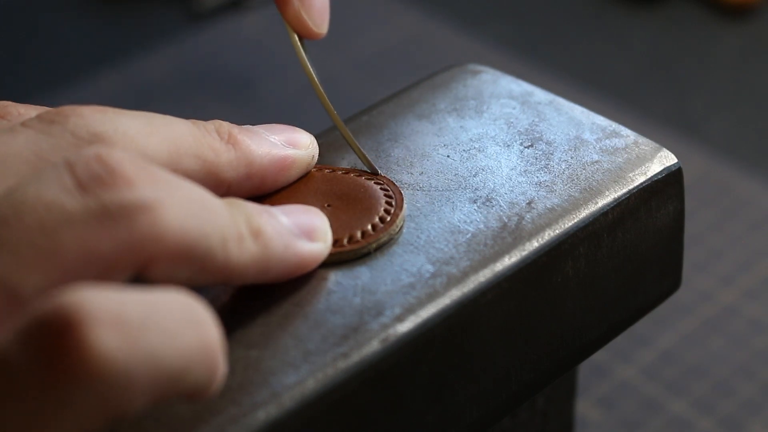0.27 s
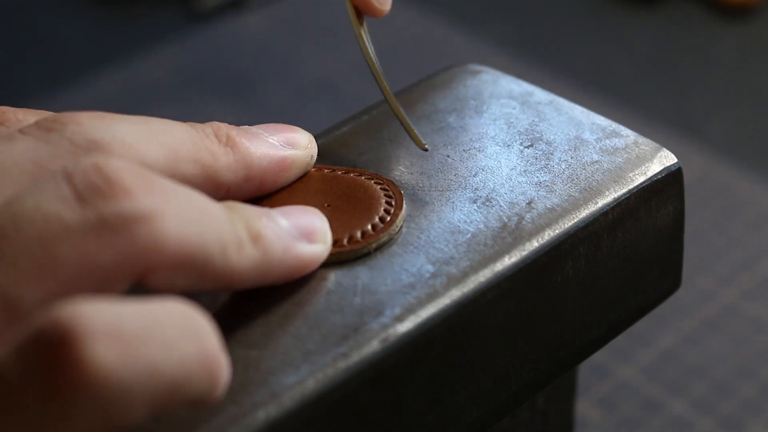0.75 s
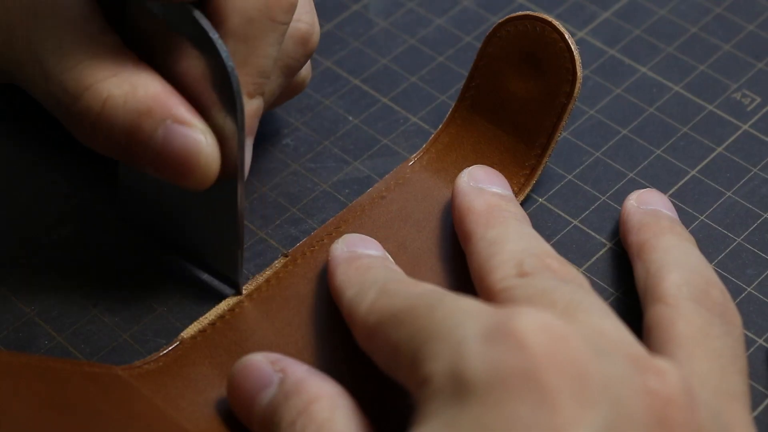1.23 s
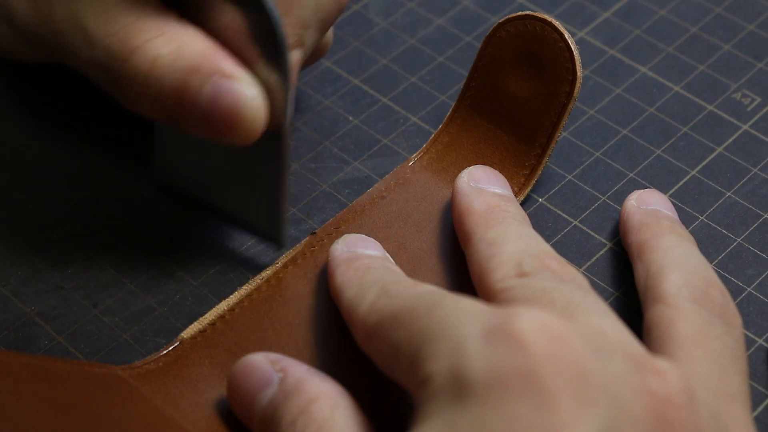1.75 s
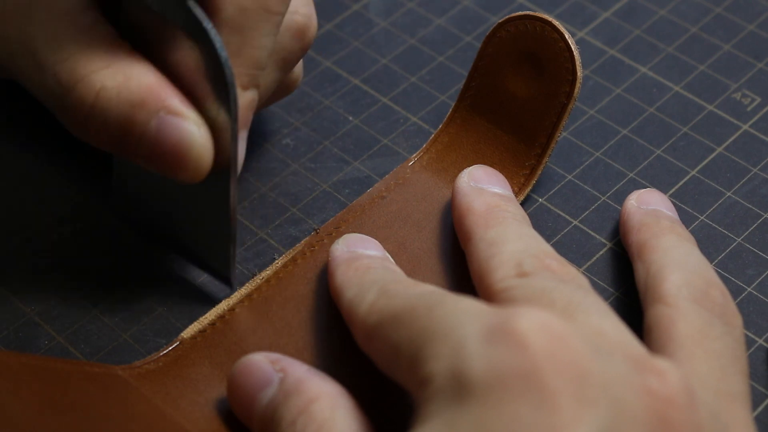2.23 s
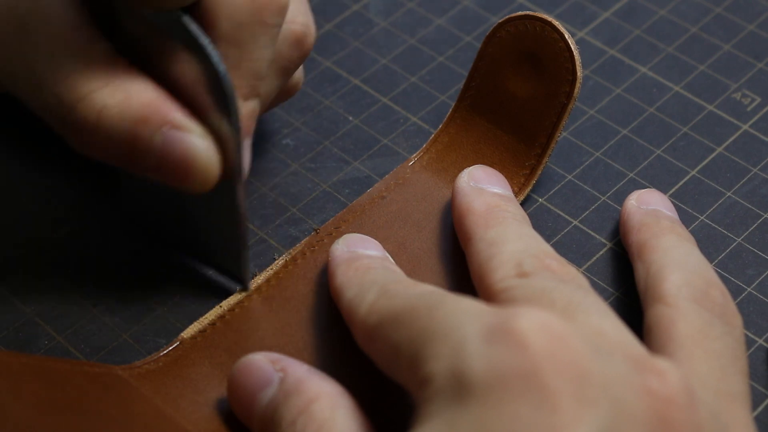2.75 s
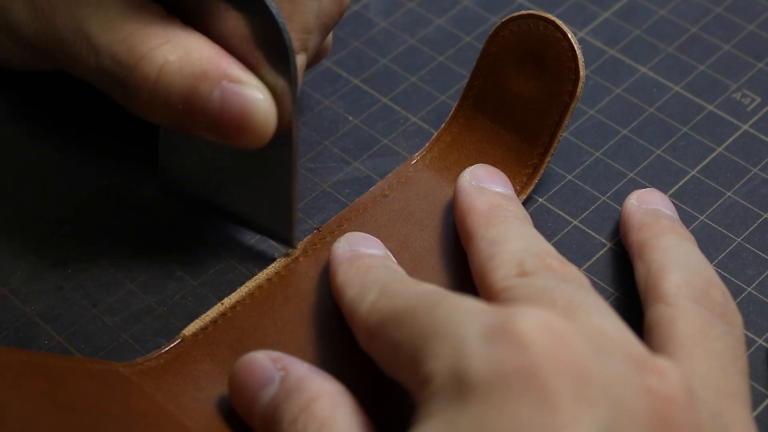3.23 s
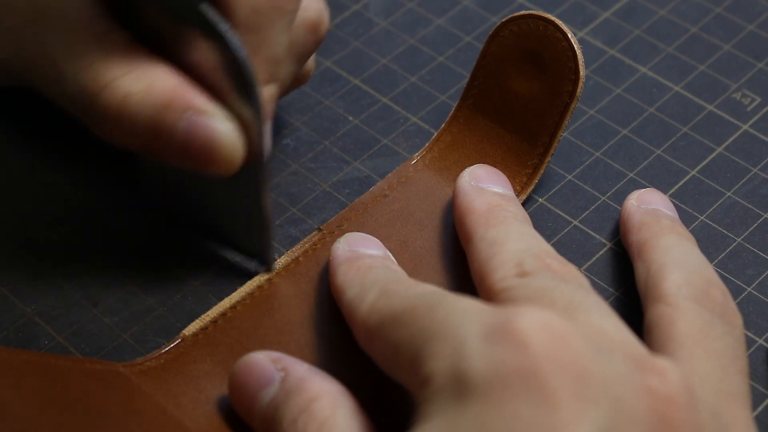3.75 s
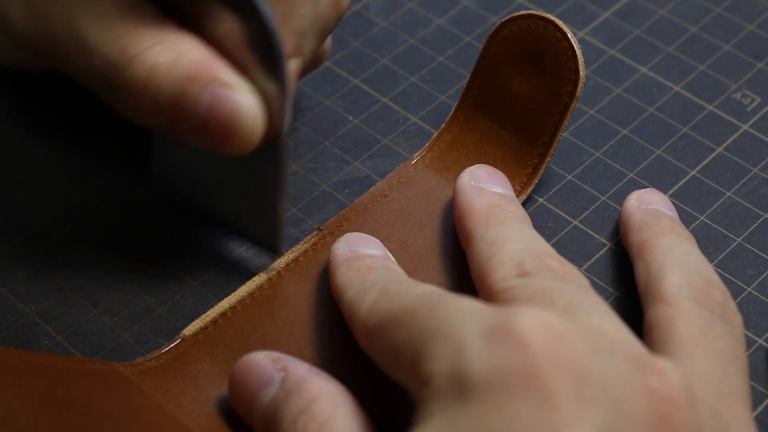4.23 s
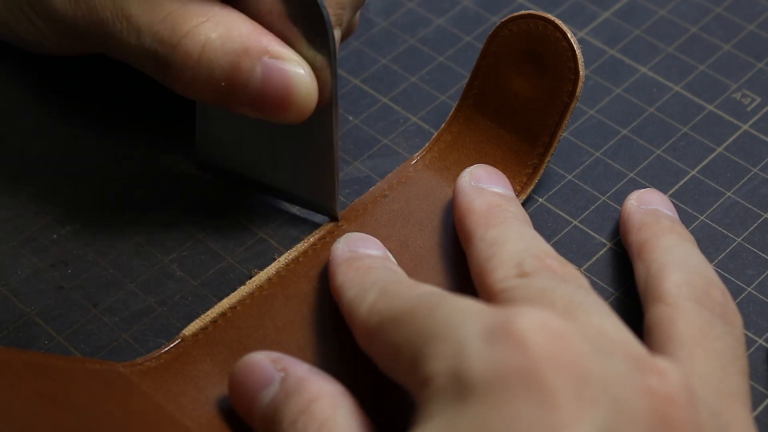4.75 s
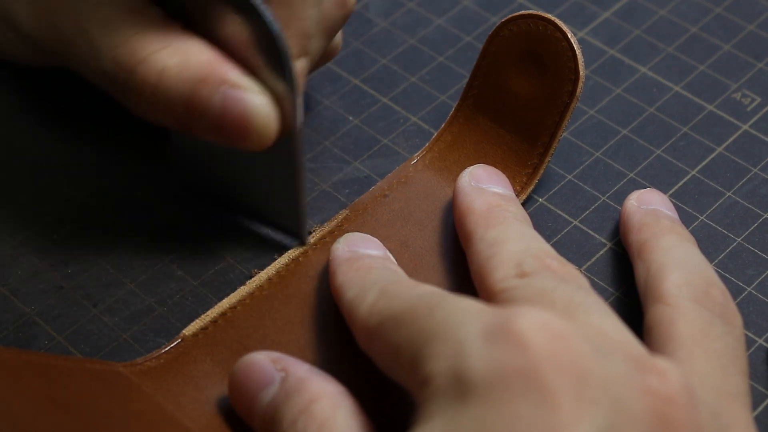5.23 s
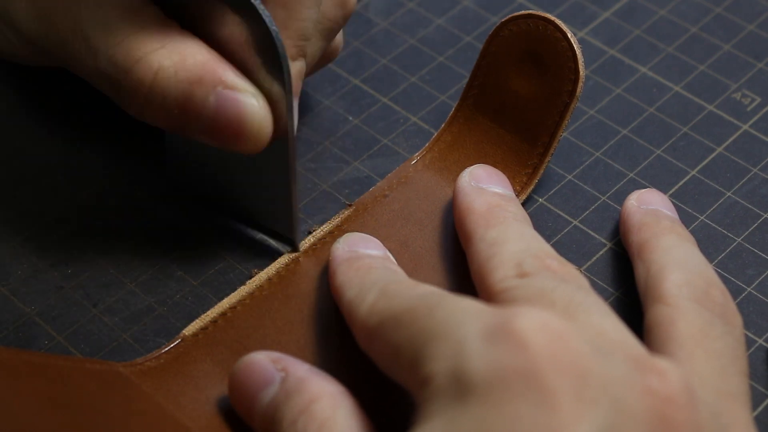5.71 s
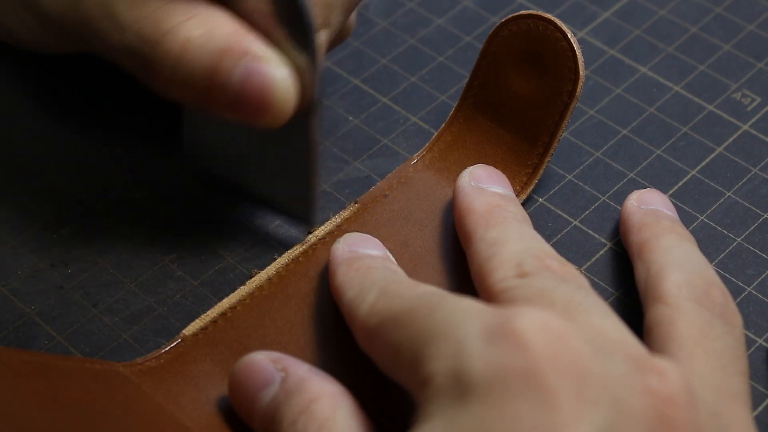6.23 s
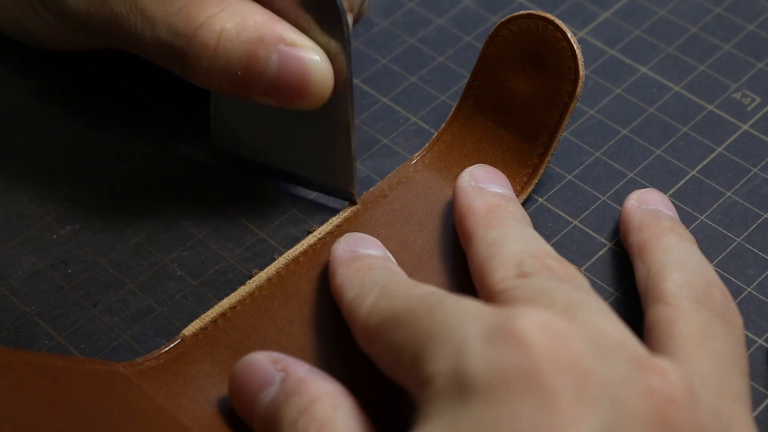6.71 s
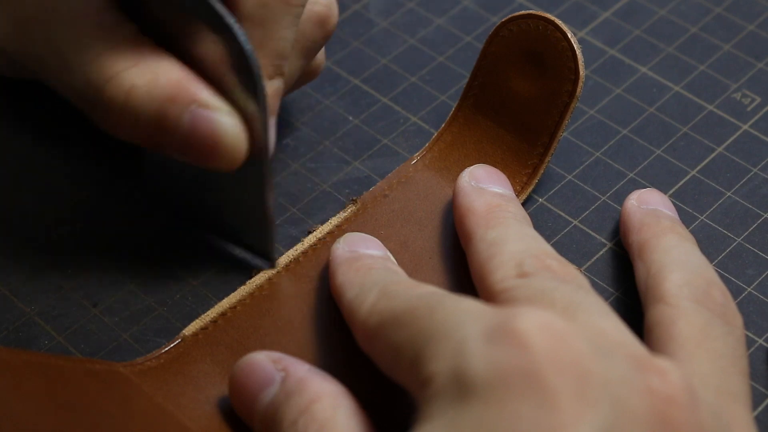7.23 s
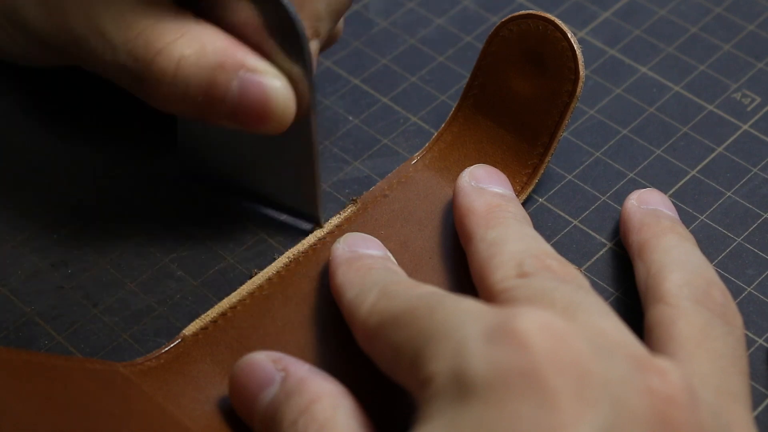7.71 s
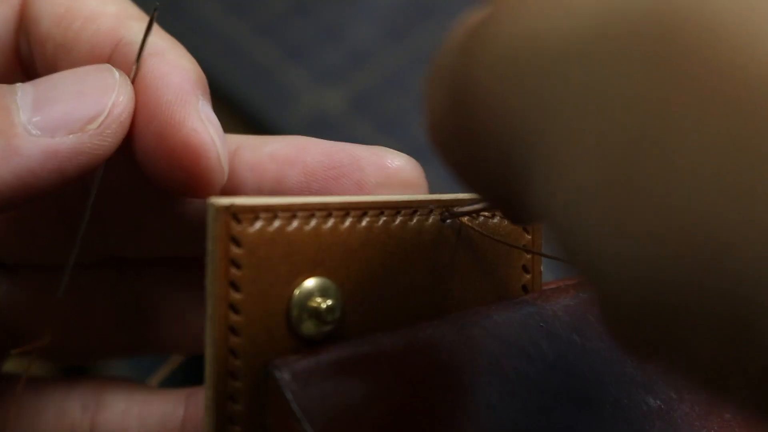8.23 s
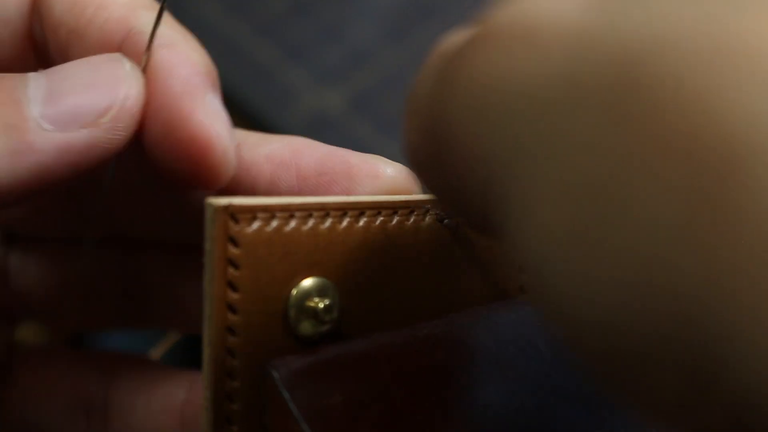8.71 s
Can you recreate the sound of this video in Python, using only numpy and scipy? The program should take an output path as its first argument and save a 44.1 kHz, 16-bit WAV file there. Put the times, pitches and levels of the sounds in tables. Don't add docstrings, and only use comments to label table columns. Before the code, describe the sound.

A thin steel scraper rasps along a leather edge in short gritty strokes, with soft taps between, in a small quiet workshop.

```python
import sys
import numpy as np
from scipy import signal
from scipy.fft import rfft, irfft, next_fast_len
from scipy.io import wavfile
from scipy.ndimage import uniform_filter1d, map_coordinates

SR = 44100
rng = np.random.default_rng(int(sys.argv[2]) if len(sys.argv) > 2 else 0)


def voltage_ratio(level):
    return 10 ** (np.asarray(level, float) / 20)


def persist_wave(psi):
    counts = np.round(np.clip(psi, -1, 1) * 32767).astype(np.int16)
    wavfile.write(sys.argv[1], SR, np.atleast_2d(counts).T)


N = 395189

# [start t/s, room hiss level/dB, hum below 300 Hz against the hiss level/dB]
SCENES = [
    (0, -66.5, -7.5),
    (0.8628, -60.5, -8),
    (8.1848, -61, -11.5),
]
# [t/s, thump rms level/dB, click peak level/dB]
LANDINGS = [(1.5903, -51.1, -46.8), (1.8969, -48.8, -39.0), (2.7619, -47.1, -44.2), (3.0696, -46.7, -40.8),
            (3.393, -50.9, -42.3), (3.7254, -48.1, -46.5), (4.0394, -47.1, -41.2), (4.3497, -45.0, -41.2),
            (4.6644, -49.2, -42.7), (4.949, -45.2, -42.1), (5.2348, -45.4, -34.9), (5.5002, -47.7, -38.4),
            (5.7655, -48.5, -40.9), (6.045, -47.0, -40.0), (6.3222, -46.0, -35.7), (6.6134, -51.1, -43.9),
            (6.9294, -58.1, -46.4), (7.2345, -46.8, -38.3), (7.9139, -45.5, -37.4)]
# [f/Hz, width/Hz, level/dB]
LEATHER = [(351, 90, -1.5), (411, 7.5, 4.5), (468, 57, 1), (482.4, 5.7, 4.5), (583, 15, -3), (606, 24, -11),
           (794, 17, -8.5), (870, 18, 1.5), (998, 33, -1.5), (1174, 81, 3), (1243, 23, -1)]


def unit(x):
    return x / np.sqrt(np.mean(x ** 2) + 1e-20)


def along(points, hz):
    f, value = np.transpose(points)
    return np.interp(np.log(hz + 1), np.log(f + 1), value)


def filtered(x, response):
    size = next_fast_len(N + SR // 2)
    return irfft(rfft(x, size) * response(np.fft.rfftfreq(size, 1 / SR)), size)[..., :N]


def modes(table):
    def response(f):
        total = 0
        for k, (centre, width, db) in enumerate(table):
            ringing = 1j * f * width / (centre * centre - f * f + 1j * f * width)
            total = total + (-1) ** k * voltage_ratio(db) * ringing
        return total
    return response


def band(lo_hz, hi_hz):
    return lambda f: (f / lo_hz) ** 4 / (1 + (f / lo_hz) ** 4) / (1 + (f / hi_hz) ** 4)


def wobble(rate):
    knots = rng.standard_normal(int(N * rate / SR) + 4)
    return map_coordinates(knots, [np.arange(N) * rate / SR])


def by_scene(column):
    starts = [row[0] for row in SCENES]
    return np.array(column)[np.searchsorted(starts, np.arange(N) / SR, side="right") - 1]


def room_tone():
    # [f/Hz, level per Hz/dB]
    hiss = [(15, -75), (25, -24), (70, -35), (86, -7.5), (152, -3), (204, -2), (227, -4), (260, -6.5),
            (389, -11.5), (973, -14.5), (1340, -17.5), (4390, -20.5), (14000, -28), (15600, -32)]
    # [f/Hz, likeness 0 to 1]
    alike = [(60, 1), (180, 0.65), (550, 0.16), (1650, 0.043), (4970, 0.02), (15000, 0.01)]

    def mid_and_side(hz):
        turn = np.arccos(np.clip(along(alike, hz), -1, 1)) / 2
        return voltage_ratio(along(hiss, hz)) * [np.cos(turn), np.sin(turn)]

    mid, side = filtered(rng.standard_normal((2, N)), mid_and_side)
    tone = unit(np.array([mid + side, mid - side]))
    hum = filtered(tone, lambda hz: 1 / (1 + (hz / 300) ** 4))
    _, level_db, hum_db = [by_scene(column) for column in np.transpose(SCENES)]
    return voltage_ratio(level_db + 3 + .4 * wobble(9)) * (tone + (voltage_ratio(hum_db) - 1) * hum)


def rubs():
    # [t/s, length/s, level/dB, f/Hz, width/Hz]
    small_rubs = [
        (0.42, 0.08, -66.5, 3300, 900),
        (.41, 0.04, -70, 6300, 2540),
        (8.303, 0.072, -69, 3780, 200),
        (8.507, 0.26, -64, 1060, 170),
        (8.785, 0.0045, -57.5, 3200, 2500),
        (8.81, 0.078, -68, 3500, 3000),
        (8.96, 0.036, -62, 1010, 150),
    ]
    t = np.arange(-SR // 4, SR // 4) / SR
    out = np.zeros((2, N + SR))
    for s, length, db, hz, width_hz in small_rubs:
        noise = rng.standard_normal(len(t)) + 0.74 * rng.standard_normal((2, len(t)))
        resonance = modes([(hz, width_hz, 0)])(np.fft.rfftfreq(len(t), 1 / SR)) ** 2
        ring = unit(irfft(rfft(noise) * resonance))
        swell = np.exp(-(2 * t / length) ** 2)
        out[:, round(s * SR) - SR // 4:][:, :len(t)] += voltage_ratio(db) * swell * ring
    return out[:, :N] * voltage_ratio(2.2 * wobble(30))


def fibres(share, scatter_db, clump_db, contact_db):
    size = voltage_ratio(scatter_db * rng.standard_normal((2, N)))
    slips = (rng.random((2, N)) < share) * rng.standard_normal((2, N)) * size
    clumps = voltage_ratio(clump_db * (0.36 * wobble(45) + wobble(170) + 0.52 * wobble(500)))
    z = signal.stft(slips * clumps, nperseg=256)[2]
    colour = uniform_filter1d(rng.standard_normal(z.shape[1:]), size=4, axis=0)
    colour = uniform_filter1d(colour, size=24, axis=1)
    return signal.istft(z * voltage_ratio(contact_db * unit(colour)), nperseg=256)[1][:, :N]


def stroke(s, run_up, hold, bite_db_per_s):
    t = np.arange(SR // 2) / SR - .1
    rise = -8 * np.clip(1 - t / run_up, 0, 1) ** 1.9 + bite_db_per_s * np.minimum(t, 0)
    droop = -6 * np.clip((t - run_up) / hold, 0, 1) ** 2
    lift = -283 * np.maximum(t - run_up - hold, 0)
    touching = t > -0.024
    return round((s - .1) * SR), np.where(touching, rise + droop + lift, -120)


def scraper():
    # [the edge bites t/s, time to full speed/s, hold until it eases/s, blade level/dB, weight on table level/dB]
    strokes = [(1.311, 0.054, 0.044, -50, -56.3), (1.622, 0.053, 0.069, -46.5, -57),
               (1.945, 0.043, 0.022, -36, -54), (2.493, 0.061, 0.036, -50.5, -53),
               (2.79, 0.059, 0.05, -47, -52.5), (3.094, 0.044, 0.071, -49, -54.5),
               (3.428, 0.04, 0.061, -44, -51.5), (3.761, 0.062, 0.033, -43.5, -50),
               (4.073, 0.04, 0.063, -43.5, -50), (4.396, 0.061, 0.042, -41.7, -46),
               (4.696, 0.056, 0.032, -43.5, -54), (4.978, 0.038, 0.05, -43.5, -49.5),
               (5.257, 0.024, 0.054, -43.5, -50.5), (5.53, 0.025, 0.041, -43.5, -50),
               (5.789, 0.057, 0.045, -47, -48.5), (6.079, 0.067, 0.025, -46, -47.5),
               (6.363, 0.041, 0.043, -41.5, -52.5), (6.656, 0.021, 0.065, -41.8, -47.0),
               (6.959, 0.069, 0.042, -45.0, -46.5), (7.284, 0.025, 0.055, -42, -48.5),
               (7.663, 0.062, 0.037, -44, -48), (7.944, 0.043, 0.03, -40, -48)]
    # [f/Hz, width/Hz, level/dB]
    blade = [(1561, 77, -1), (2074, 48, 2), (2235, 105, 2), (2380, 51, -7), (2736, 59, -17.5),
             (3958, 82, -2), (4730, 34, 0.5), (4910, 180, -4), (6700, 320, -17), (7480, 190, -7.5),
             (8280, 270, -14.5), (9940, 140, -13), (12100, 900, -25), (13800, 770, -16.5)]
    # [f/Hz, level per Hz/dB]
    scratch = [(53, -46), (90, -16), (218, 5), (669, 2), (2240, -4.5), (2490, -4), (4860, -9),
               (8330, -15.5), (9080, -19.5), (12300, -17), (15600, -34)]
    # [f/Hz, width/Hz, level/dB]
    table_top = [(100, 6.2, -40), (128, 67, -22), (172, 5.8, -3.5), (188, 8.7, -3.5), (223.8, 32.6, 2),
                 (268.5, 14, -2)]

    gains = np.zeros((4, N))
    leads = [0, .008, .017, 0]
    for s, run_up, hold, db, table_db in strokes:
        leather_db = db - 48 * run_up + 0.18 * (s - 5)
        fizz_db = db - 9.5 - 0.25 * (db + 45.5) + 0.33 * (s - 5)
        levels_db = [db, leather_db, table_db + 2.5, fizz_db]
        landed = any(0 < s - landing[0] < .1 for landing in LANDINGS)
        bite_db_per_s = 1100 if landed else 295
        for gain, level_db, lead in zip(gains, levels_db, leads):
            at, speed_db = stroke(s - lead, run_up, hold + lead, bite_db_per_s)
            gain[at:][:len(speed_db)] += voltage_ratio(level_db + speed_db)

    slips = fibres(share=.3, scatter_db=2, clump_db=1.4, contact_db=1.7)
    steel = lambda f: modes(blade)(f) + voltage_ratio(-5.5 + along(scratch, f))
    parts = [lambda f: steel(f) * band(1350, 6200)(f),
             lambda f: (modes(LEATHER)(f) + voltage_ratio(-8)) * band(310, 1550)(f),
             lambda f: modes(table_top)(f) * band(85, 330)(f),
             lambda f: steel(f) * band(6000, 19000)(f)]
    out, hz = 0, np.fft.rfftfreq(8192, 1 / SR)
    for part, gain in zip(parts, gains):
        scale = np.std(slips) * np.sqrt(np.mean(abs(part(hz)) ** 2))
        out = out + filtered(slips * gain, part) / scale
    return out


def taps():
    # [f/Hz, time to fall 60 dB/s, level/dB]
    mat = [(1320, .012, -1), (700, .014, -2), (2000, .006, -5), (2900, .006, -7), (1150, .035, -15),
           (1700, .03, -14)]
    # [f/Hz, time to fall 60 dB/s, share]
    table_swing = [(135, .15, .55), (162, .2, -.4), (187, .17, .12), (227, .15, -1), (264, .15, -.1),
                   (350, .09, -.5)]
    t = np.arange(SR // 4) / SR
    push = np.pad(np.hanning(132), (12, 0))
    out, settle = np.zeros(N), np.zeros(N)
    for s, thump_db, click_db in LANDINGS:
        ring, knock = 0, 0
        for hz, t60, share in table_swing:
            decay = voltage_ratio(rng.normal(0, 1.5) - 60 * t / t60)
            ring = ring + share * decay * np.cos(2 * np.pi * hz * t)
        for hz, t60, db in mat:
            decay = voltage_ratio(db + rng.normal(0, 2) - 60 * t / t60)
            knock = knock + decay * np.sin(2 * np.pi * hz * rng.normal(1, .05) * t)
        swing = np.convolve(push, ring)[:len(t)]
        thump = voltage_ratio(thump_db + .5) * swing / np.std(swing[:700])
        at = round(s * SR)
        out[at:][:len(t)] += thump + voltage_ratio(click_db - 2) * knock
        settle[at:][:len(t)] += voltage_ratio(click_db + 7.5 - 60 * t / 0.065) * rng.standard_normal(len(t))
    out = filtered(out, lambda f: (1j * f / (1j * f + 60)) ** 2)
    return out + filtered(settle, lambda f: modes(LEATHER)(f) + modes([(1400, 1800, -8)])(f) ** 2)


def workshop(x):
    # [f/Hz, time to fall 60 dB/s]
    decay = [(200, 0.29), (2000, 0.43), (10000, 0.22)]
    hz, t, z = signal.stft(rng.standard_normal((2, SR // 2)), SR, nperseg=256)
    fading = voltage_ratio(-60 * t / along(decay, hz)[:, None])
    tail = signal.istft(z * fading, SR, nperseg=256)[1]
    late = np.pad(x, (300, 0))[None]
    return signal.fftconvolve(late, tail / np.linalg.norm(tail[0]), axes=1)[:, :N]


def two_ears(mid, side):
    # [f/Hz, side against middle level/dB]
    spread = [(60, -8), (110, -10), (200, -12), (380, -10), (700, -9), (1290, -8), (2380, -5), (4400, -2),
              (8120, -1), (15000, -2)]
    # [f/Hz, left against right level/dB]
    lean = [(60, -13), (110, 3.5), (200, 1), (380, 0.5), (700, 0), (1290, 0.5), (2380, -1), (4400, -2.5),
            (8120, 0.5), (15000, 0.5)]
    # [f/Hz, how far the left leads/radians]
    lag = [(0, 0), (690, -0.2), (1550, -0.0), (2330, -0.5), (2760, 0.2), (3100, -0.4), (3960, 0.4),
           (4650, -1.1), (5680, 1.6), (6630, 0.3), (13400, 0.6), (14400, 0.3), (14800, 0.7), (15300, -5.5)]
    half = np.array([[.5], [-.5]])
    side = filtered(side, lambda hz: voltage_ratio(along(spread, hz) - 2.5))
    ears = lambda hz: voltage_ratio(along(lean, hz) * half) * np.exp(1j * along(lag, hz) * half)
    return filtered(np.array([mid + side, mid - side]), ears)


def scene():
    room, small_rubs = room_tone(), rubs()
    mid, side = scraper()
    mid = mid + taps()
    echo, echo_side = voltage_ratio(-7.5) * workshop(mid)
    near = two_ears(mid + echo, side + echo_side)
    scraping = np.arange(N) < 8.1843 * SR
    return near * scraping + room + small_rubs


def scene_changes():
    since = np.arange(N) / SR - by_scene([-9, SCENES[1][0], SCENES[2][0]])
    fade_in = np.clip(since / .05, 0, 1) ** 1.5 + voltage_ratio(-30)
    return fade_in * voltage_ratio(-13.5 * np.exp(-since / 0.096))


def band_limit(x):
    return signal.sosfilt(signal.butter(12, 15720, fs=SR, output="sos"), x)


def record(dry):
    mix = dry * scene_changes()
    return band_limit(mix)


dry = scene()
out = record(dry)
persist_wave(out)
```